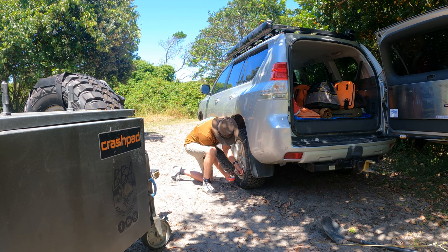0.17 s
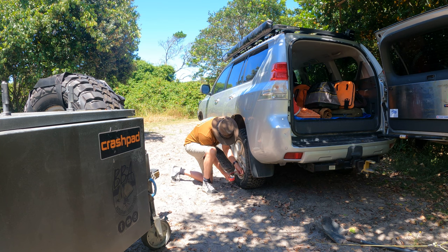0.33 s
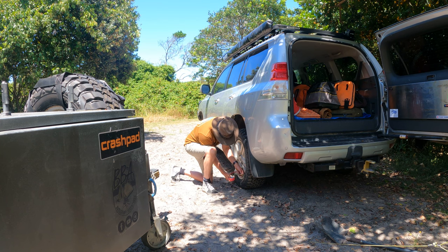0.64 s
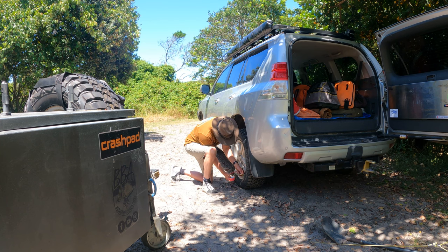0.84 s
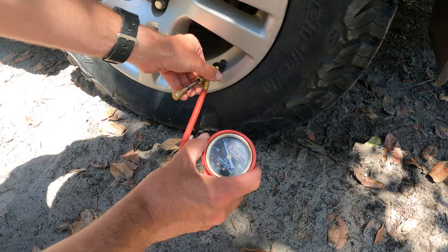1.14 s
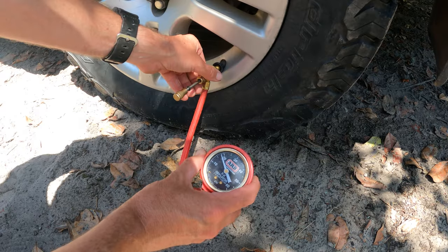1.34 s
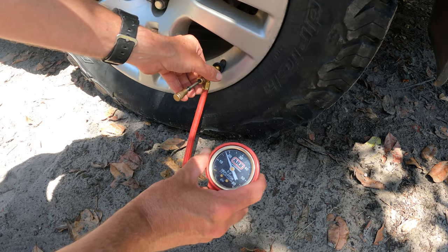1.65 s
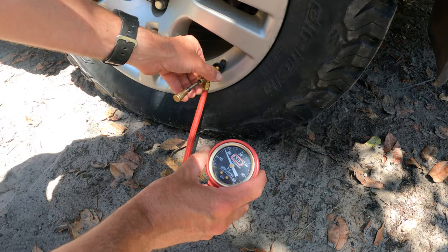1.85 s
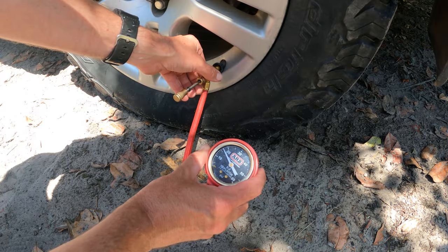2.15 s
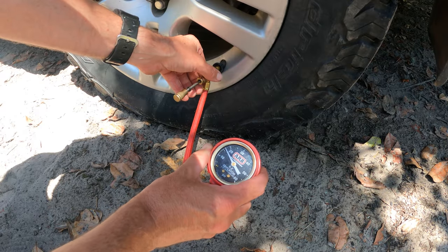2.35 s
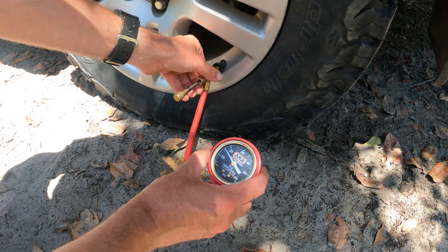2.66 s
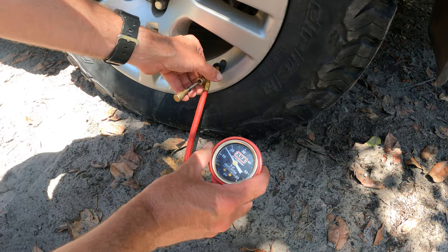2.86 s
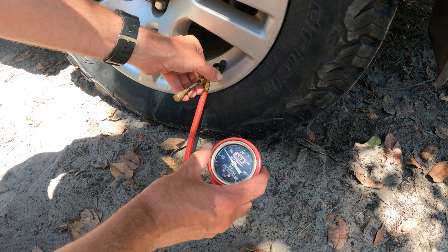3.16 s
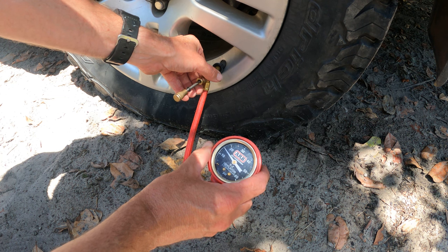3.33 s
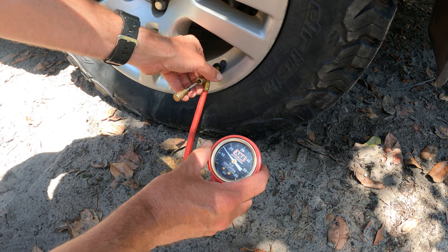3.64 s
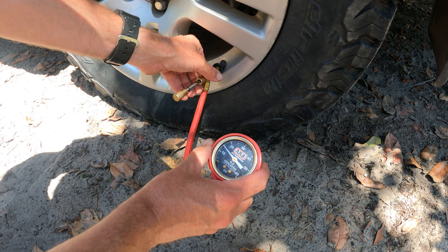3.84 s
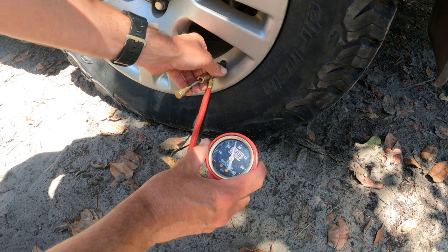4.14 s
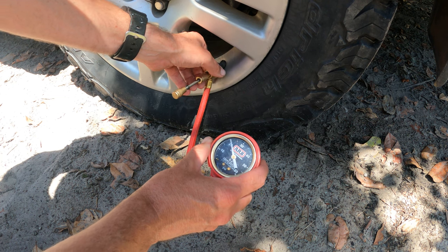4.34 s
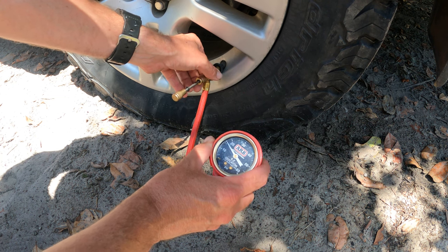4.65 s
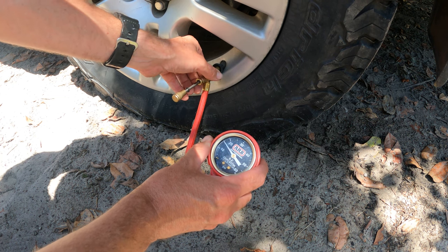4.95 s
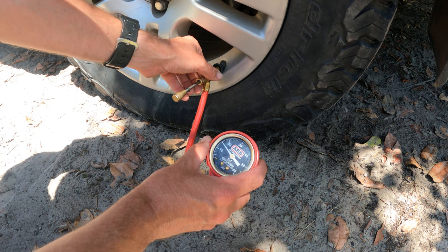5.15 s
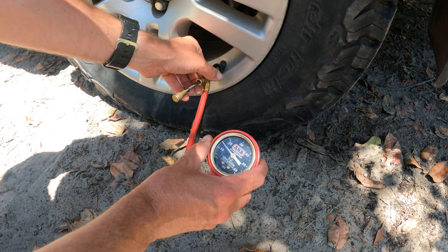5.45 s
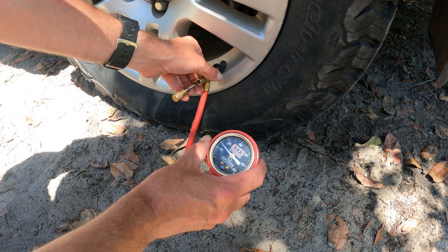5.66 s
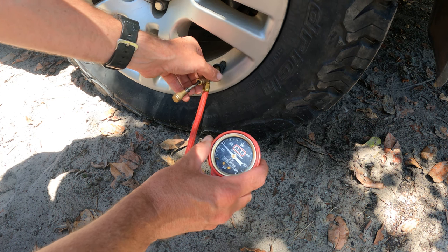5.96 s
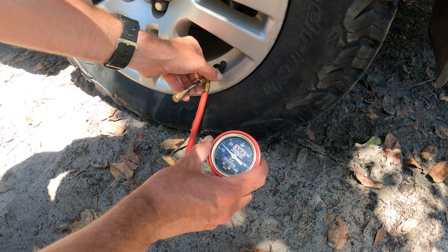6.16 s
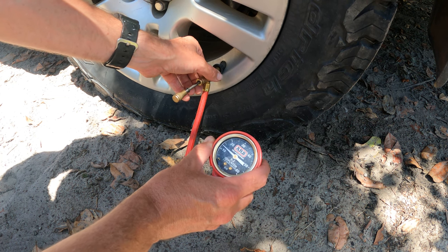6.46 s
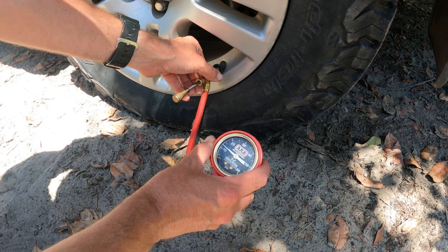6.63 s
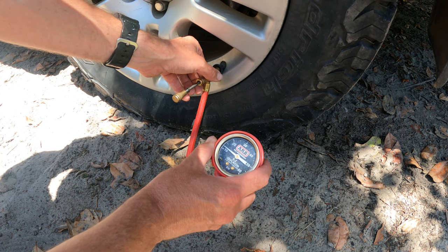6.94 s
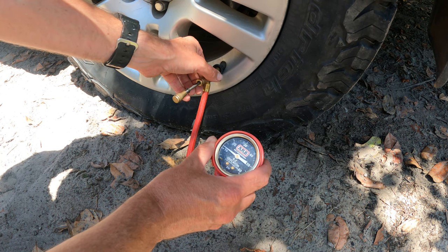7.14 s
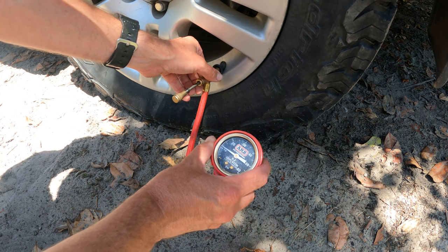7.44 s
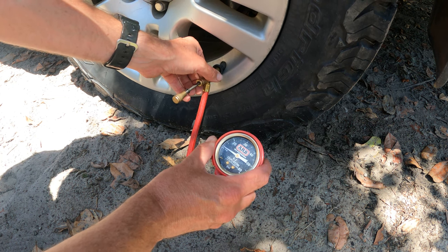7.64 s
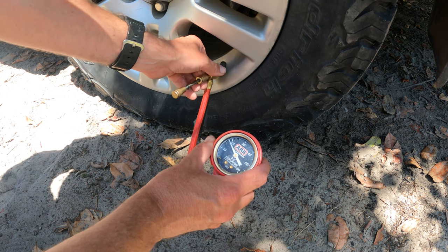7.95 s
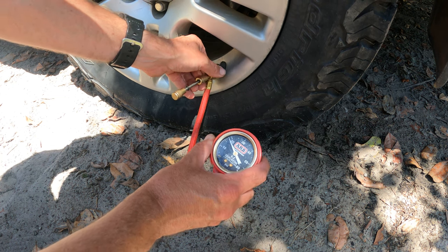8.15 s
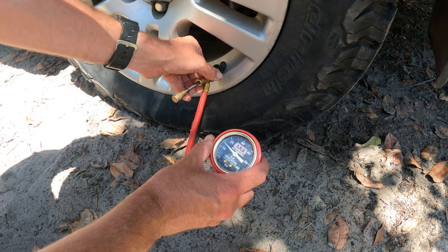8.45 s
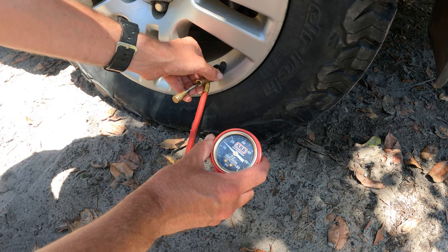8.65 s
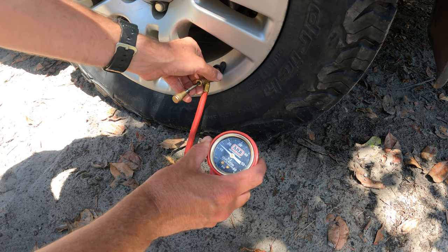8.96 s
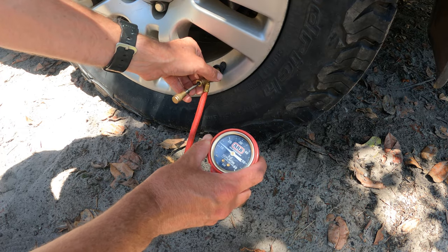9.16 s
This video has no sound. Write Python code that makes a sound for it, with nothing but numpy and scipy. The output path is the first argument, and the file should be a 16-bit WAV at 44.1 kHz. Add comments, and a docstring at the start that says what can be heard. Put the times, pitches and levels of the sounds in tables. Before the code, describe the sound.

A tyre is let down in close-up: harsh rushing hiss, cut off abruptly twice, restarting with a soft thump over faint outdoor breeze.

```python
"""Tyre let down at a campsite

Three hard blasts of air, noise coloured by the deflator, wheel and hand, with two stops to read the gauge.
The valve whistles, ticks and thumps as short resonant bursts; decaying noise echoes the hiss from the trees.
Low noise in gusts rumbles on the microphone over a faint, steady outdoor wash."""
import sys
import numpy as np
from scipy import signal
from scipy.fft import rfft, irfft
from scipy.io import wavfile
from scipy.ndimage import uniform_filter1d, minimum_filter1d

SR = 44100
rng = np.random.default_rng(int(sys.argv[2]) if len(sys.argv) > 2 else 0)


def materialize(psi):
    """Save the field psi as 16-bit PCM at rate SR to the path in sys.argv[1].

    A 1-D psi becomes a single channel; in a 2-D psi each row is a channel.
    """
    bounded = np.clip(np.atleast_2d(psi).T, -1, 1)
    quanta = np.round(bounded * 32767).astype(np.int16)
    wavfile.write(sys.argv[1], SR, quanta)


N = 410130


def amp(db):
    """Decibels to gain."""
    return 10 ** (np.asarray(db) / 20)


def evened(x):
    """Scales to rms 1."""
    return x / np.sqrt(np.mean(x ** 2) + 1e-20)


def read(points, hz):
    """Interpolates a spectrum table on a log-frequency axis."""
    f, value = np.transpose(points)
    return np.interp(np.log(hz + 1), np.log(f + 1), value)


def follow(rows, t):
    """Interpolates each column of a curve table at the times t."""
    s, *columns = np.transpose(rows)
    return [np.interp(t, s, column) for column in columns]


def bells(rows, hz):
    """Summed lift in dB of resonances; width is full width at half the lift."""
    return sum(db * np.exp(-np.log(2) * (2 * (hz - f) / width) ** 2) for f, width, db in rows)


def swell(t, s, half_s):
    """Smooth rise and fall of height 1 around the time s."""
    return np.exp(-((t - s) / half_s) ** 2)


def noise(points):
    """Steady noise of rms 1 with the given spectrum."""
    hz = np.fft.rfftfreq(N, 1 / SR)
    spectrum = rfft(rng.standard_normal(N)) * amp(read(points, hz))
    return evened(irfft(spectrum, N))


def wander(rate_hz):
    """Random motion of rms 1, up to about the given rate."""
    hz = np.fft.rfftfreq(N, 1 / SR)
    spectrum = rfft(rng.standard_normal(N)) / (1 + (hz / rate_hz) ** 2)
    return evened(irfft(spectrum, N))


def swirl(shape):
    """Smoothed random patches of rms 1 over (bins, frames)."""
    across_bins = uniform_filter1d(rng.standard_normal(shape), size=16, axis=0)
    return evened(uniform_filter1d(across_bins, size=12, axis=1))


def near_echoes(hz, frame_s, share=0.08, small_hz=2500, drift_s=.00005, drift_hz=.4, count=8):
    """Arm and gauge are small and return mainly treble: fine ripples that slide as the hand moves."""
    motion = np.interp(frame_s, np.arange(N) / SR, wander(drift_hz))
    paths = rng.uniform([.002, -1], [.008, 1], (count, 2))  # delay_s, share of the motion
    echoes = 0
    for delay_s, way in paths:
        echoes = echoes + np.exp(-2j * np.pi * np.outer(hz, delay_s + drift_s * way * motion))
    treble = hz / np.hypot(hz, small_hz)
    return 1 + share * treble[:, None] * echoes


# hand on the tool: time_s, low_roar_db, grip_firmness_0_1, edge_db (shrill edge against the hiss)
GRIP = [(0, 0, 0.5, -60), (1.1, -2, 0.2, -51), (1.6, -2.5, 0.3, -63), (4.2, -2, 0.48, -57),
        (4.6, -0.5, 0.87, -55), (6.3, -1, 0.84, -28), (7.8, -0.4, 1, -19), (8.35, 0.1, 1, -12),
        (9.3, 2, 1, -11)]
# jet turbulence: freq_hz, relative_db_per_hz
JET = [(40, -38), (175, -7), (260, -12), (460, -18.5), (540, -11.5), (720, -5.5), (1050, -7.5), (1900, 1),
       (2400, 3), (2650, -7.5), (3700, -13.5), (5400, -2), (9400, -5.5), (10200, -19), (13000, -33.5),
       (16000, -39)]
# resonances and dips of tool and wheel hollow: freq_hz, width_hz, lift_db
WHEEL = [(324, 43, 3.5), (410, 77, -0.5), (1130, 100, 2.5), (1435, 68, 2.7), (2045, 80, -6),
         (2885, 176, 4.5), (3984, 70, 5), (4170, 120, 4.5), (4250, 450, -2.5), (5810, 370, 2),
         (6350, 140, 3.5), (6740, 180, 2), (7700, 220, -2.5), (8800, 160, -5.5), (9230, 130, 3.5)]
# gap between hand and rim, loose grip: freq_hz, width_hz, lift_db
LOOSE_GRIP = [(840, 98, -3), (1323, 62, 5), (1850, 490, 4.5), (2236, 60, -3.5), (2463, 190, -5),
              (3100, 140, -6), (3360, 180, 2), (4440, 300, 1.5), (5100, 260, 3.5), (8300, 280, 0),
              (9120, 150, -7.5), (9650, 630, -4.5)]
# the same gap, firm grip: freq_hz, width_hz, lift_db
FIRM_GRIP = [(1250, 72, -2), (1545, 120, -6.5), (1890, 49, 3.5), (2353, 70, 2.5), (2560, 440, -6),
             (3670, 360, -3.5), (4850, 150, -4.5), (5170, 130, -2.5), (5710, 100, -1.5), (6360, 460, -4.5),
             (8670, 220, 4), (9660, 120, 5.5)]


def hiss(swirl_db=0.84, roar_hz=1200, spread_db=-29, roar_spread_db=-24):
    """Turbulent air of rms 1, coloured by the wheel and the hand."""
    source = rng.standard_normal((2, N))
    hz, frame_s, (middle, side) = signal.stft(source, SR, nperseg=2048, noverlap=1536)
    roar_db, firm, _ = follow(GRIP, frame_s)
    low = 1 / (1 + (hz / roar_hz) ** 4)
    colour_db = (read(JET, hz) + bells(WHEEL, hz))[:, None] + np.outer(low, roar_db)
    colour_db += np.outer(bells(LOOSE_GRIP, hz), 1 - firm) + np.outer(bells(FIRM_GRIP, hz), firm)
    colour = amp(colour_db + swirl_db * swirl(colour_db.shape)) * near_echoes(hz, frame_s)
    side = side * (amp(spread_db) + amp(roar_spread_db) * low ** 4)[:, None]
    stereo = np.array([middle + side, middle - side]) * colour
    air = signal.istft(stereo, SR, nperseg=2048, noverlap=1536)[1]
    return evened(air[:, :N])


# shrill edge of the jet at the outlet lip: freq_hz, relative_db_per_hz
EDGE = [(9000, -49), (11000, -13.5), (12000, -6.5), (12700, -1), (13600, -6.5), (14400, -11.5),
        (15600, -12), (16500, -12)]


def shrill_edge(same=.5, left_db=-3.5):
    """Highest hiss of the outlet lip: reaches the right port one sample earlier and more strongly."""
    right, other = noise(EDGE), noise(EDGE)
    left = same * np.roll(right, 1) + np.sqrt(1 - same ** 2) * other
    return np.array([amp(left_db) * left, right])


# blasts: opens_s, shuts_s, level_db
BLASTS = [(-0.3, 4.171, -11), (4.545, 7.902, -11), (8.321, 9.6, -11.5)]


def valve(t, open_db_per_s, shut_db_per_s=1050, surge_db=0.3, surge_s=0.026, squeeze_db=-1.5, squeeze_s=0.016):
    """Gain of the valve: a slight surge of pressure as it cracks open, a dip as the gap narrows shut."""
    gain = np.zeros(N)
    for opens_s, shuts_s, level_db in BLASTS:
        closed_db = open_db_per_s * np.maximum(opens_s - t, 0)
        closed_db += shut_db_per_s * np.maximum(t - shuts_s, 0)
        ends_db = surge_db * swell(t, opens_s, surge_s) + squeeze_db * swell(t, shuts_s, squeeze_s)
        gain += amp(level_db + ends_db - closed_db)
    return gain


# brief sags of the hiss: time_s, depth_db
SAGS = [(0.40, 3), (0.71, 2.5), (1.22, 1.3), (7.28, 1.1), (9.08, 1.2)]


def jet(sputter_db=0.38, sputter_hz=70, pump_db=0.47, pump_hz=7, thin_hz=4500, sag_half_s=0.048):
    """Air follows the valve, thin hiss before body; it pumps slowly, sputters fast and sags at times."""
    t = np.arange(N) / SR
    edge_db = follow(GRIP, t)[2]
    air = hiss() + shrill_edge() * amp(edge_db)
    hz = np.fft.rfftfreq(N, 1 / SR)
    body = irfft(rfft(air) / (1 + (hz / thin_hz) ** 8), N)
    thin = air - body
    let_out = thin * valve(t, open_db_per_s=1100) + body * valve(t, open_db_per_s=1800)
    sag_db = sum(depth_db * swell(t, s, sag_half_s) for s, depth_db in SAGS)
    unsteady_db = sputter_db * wander(sputter_hz) + pump_db * wander(pump_hz)
    return let_out * amp(unsteady_db - sag_db)


# ring of the clearing: freq_hz, t60_s
CLEARING = [(200, .45), (2000, 0.65), (4500, 0.53), (9500, 0.36), (15000, 0.29)]
# echo colour, hiss gathered from all directions: freq_hz, level_db
ECHO = [(600, 0), (2200, -8), (2700, -2), (4200, 4), (5500, -1.5), (9500, -0.5), (12500, 9)]


def clearing(x, wet_db=-24, spread_db=-16, build_s=0.037):
    """Scattered echoes from vehicle and trees build up, then fade at a rate set by frequency."""
    hz, t, z = signal.stft(rng.standard_normal((2, SR)), SR, nperseg=256)
    decay_db = 60 * t / read(CLEARING, hz)[:, None]
    fade = amp(read(ECHO, hz)[:, None] - decay_db) * (1 - np.exp(-t / build_s))
    middle, side = signal.istft(z * fade, SR, nperseg=256)[1]
    side = amp(spread_db) * side
    tails = np.array([middle + side, middle - side]) / np.linalg.norm(middle)
    return amp(wet_db) * signal.fftconvolve(x, tails, axes=1)[:, :N]


# deep wind buffeting: freq_hz, relative_db_per_hz
BUFFET = [(8, -13), (22, -1), (45, 1), (65, -1), (110, -19.5), (300, -62), (3000, -110)]
# faster wind flutter: freq_hz, relative_db_per_hz
FLUTTER = [(30, -28), (70, 0), (120, -1.5), (170, -6.5), (260, -14), (400, -24.5), (1200, -60),
           (6000, -110)]
# gusts on the microphone: time_s, half_length_s, buffet_db, flutter_db
GUSTS = [(0.40, 0.089, -22, -24.5), (0.574, 0.056, -22.5, -24.5), (0.74, 0.1, -24, -29),
         (1.03, 0.12, -34, -28), (1.74, .045, -19.5, -28), (2.03, .11, -26, -34), (3.64, .05, -45, -24.5),
         (3.98, 0.13, -36, -31.5)]


def wind(breeze_db=-33.5, eases_s=3.9, calm_s=6.1, ease_db=9.5, flutter_db=1.5, spread_db=-30):
    """Eddies push on the microphone, nearly alike in both channels: gusts on a breeze that eases off."""
    t = np.arange(N) / SR
    breeze = amp(breeze_db - ease_db * np.interp(t, [eases_s, calm_s], [0, 1]))
    deep, fast = breeze, breeze * amp(flutter_db)
    for s, half_s, gust_deep_db, gust_fast_db in GUSTS:
        gust = swell(t, s, half_s)
        deep = np.hypot(deep, amp(gust_deep_db) * gust)
        fast = np.hypot(fast, amp(gust_fast_db) * gust)
    middle, side = (deep * noise(BUFFET) + fast * noise(FLUTTER) for _ in range(2))
    side = amp(spread_db) * side
    return np.array([middle + side, middle - side])


# far outdoor wash: freq_hz, relative_db_per_hz
WASH = [(100, -4), (400, 0), (560, 2.5), (800, -2), (1300, -3.5), (2000, -6.5), (3300, -18.5),
        (6000, -23.5), (9500, -31), (11000, -50), (16000, -63)]


def wash(level_db=-45.5, spread_db=-16):
    """Distant breeze in the trees as steady, slightly spread noise."""
    side = amp(spread_db) * noise(WASH)
    return (noise(WASH) + np.array([side, -side])) * amp(level_db)


# valve seating whistles, brass ticks, opening thumps: start_s, pitch_hz, width_hz, level_db, decay_s
KNOCKS = [(4.188, 1830, 140, -38.5, 0.043), (4.305, 8900, 600, -46, 0.0083),
          (4.497, 2000, 1300, -36, 0.0044), (4.545, 158, 45.2, -21, .08), (7.925, 1790, 110, -35, 0.026),
          (8.32, 130, 90, -26, .025)]


def knocks():
    """Each valve sound is a quickly dying noise burst in one resonance."""
    out, hz = np.zeros(N), np.fft.rfftfreq(N, 1 / SR)
    for start_s, pitch_hz, width_hz, level_db, decay_s in KNOCKS:
        age = np.maximum(np.arange(N) / SR - start_s, 0) / decay_s
        resonance = 1 / (1 + (2 * (hz - pitch_hz) / width_hz) ** 2)
        ring = evened(irfft(rfft(rng.standard_normal(N)) * resonance, N))
        out += amp(level_db) * ring * (1 - np.exp(-10 * age)) * np.exp(-age)
    return out


def scene():
    """Jet, valve sounds and their echoes over wind and wash."""
    near = jet() + knocks()
    return near + clearing(near) + wind() + wash()


def record(dry, ceiling=.95, hold_samples=65, cut_hz=15750):
    """A fast limiter rounds off the highest peaks; a low-pass then limits the band."""
    room = np.minimum(1, ceiling / (abs(dry).max(0) + 1e-9))
    gain = uniform_filter1d(minimum_filter1d(room, size=hold_samples), size=hold_samples)
    low_pass = signal.firwin(511, cut_hz, window=("kaiser", 9), fs=SR)
    return signal.oaconvolve(dry * gain, low_pass[None], "same")


dry = scene()
out = record(dry)
materialize(out)
```